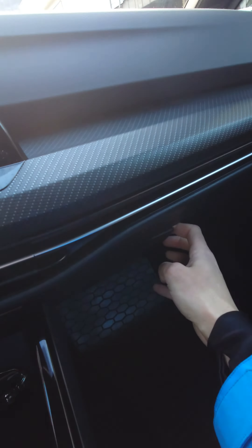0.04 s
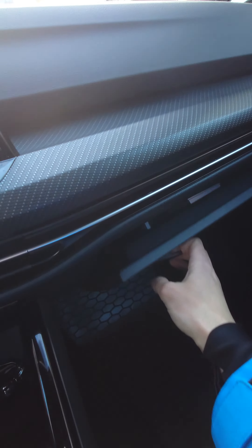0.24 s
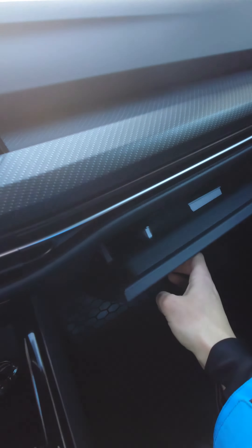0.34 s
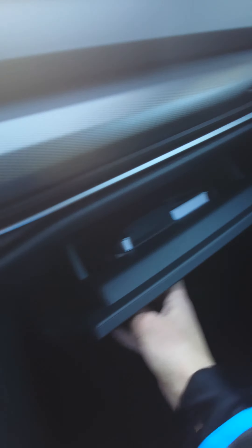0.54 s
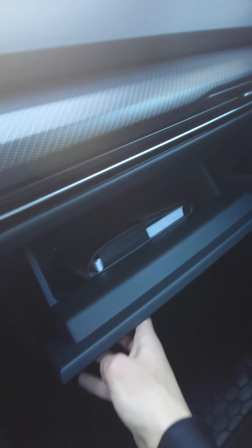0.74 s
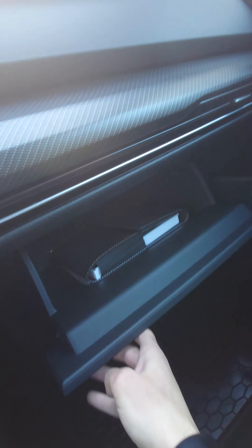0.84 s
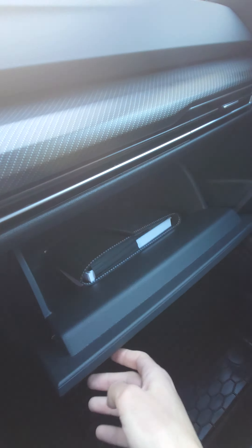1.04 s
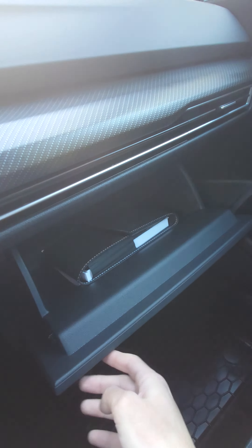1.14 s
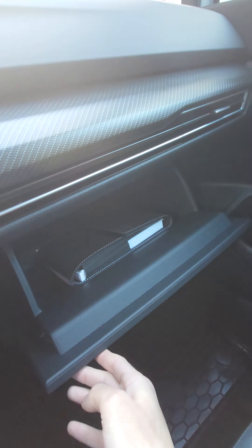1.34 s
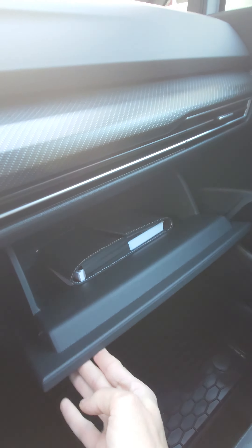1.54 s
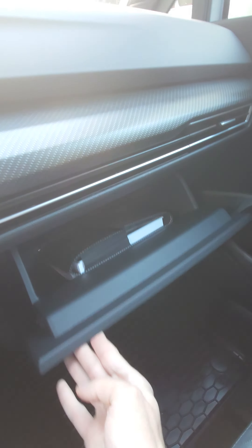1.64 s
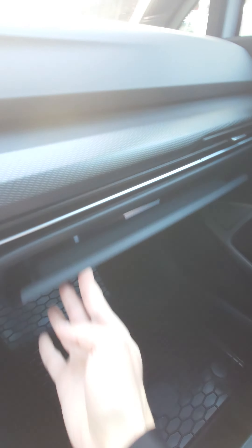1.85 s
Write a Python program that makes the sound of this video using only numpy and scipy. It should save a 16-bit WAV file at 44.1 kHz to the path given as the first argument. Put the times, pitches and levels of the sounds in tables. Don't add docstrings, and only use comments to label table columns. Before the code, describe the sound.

A car glovebox is opened by hand: faint handle touches, a sharp latch snap with a hollow thump, a soft airy lowering, light knocks, then quiet creaky rubbing. Close stereo microphone in a still, parked cabin.

```python
import sys
import numpy as np
from scipy import signal
from scipy.fft import rfft, irfft, next_fast_len
from scipy.io import wavfile
from scipy.ndimage import map_coordinates

SR = 44100
rng = np.random.default_rng(int(sys.argv[2]) if len(sys.argv) > 2 else 0)


def convert_level_to_amplitude(level_db):
    exponent = np.asarray(level_db, float) / 20
    return 10 ** exponent


def put_to_file(sound):
    columns = np.atleast_2d(sound).T
    safe = np.clip(columns, -1, 1)
    whole_steps = np.round(safe * 32767)
    wavfile.write(sys.argv[1], SR, whole_steps.astype(np.int16))


N = 83790


def along(points, hz):
    point_hz, value = np.transpose(points)
    return np.interp(np.log(hz + 1), np.log(point_hz + 1), value)


def curve(rows):
    point_s, value = np.transpose(rows)
    return np.interp(np.arange(N) / SR, point_s, value)


def unit(x):
    return x / np.sqrt(np.mean(x ** 2) + 1e-20)


def wobble(rate_hz):
    knots = rng.standard_normal(int(N * rate_hz / SR) + 4)
    return map_coordinates(knots, [np.arange(N) * rate_hz / SR])


def filtered(x, response):
    size = next_fast_len(N + SR // 2)
    hz = np.fft.rfftfreq(size, 1 / SR)
    return irfft(rfft(x, size) * response(hz), size)[..., :N]


def add(x, start_s, piece):
    part = x[..., round(start_s * SR):][..., :piece.shape[-1]]
    part += piece[..., :part.shape[-1]]


# centre_hz, width_hz, level_db
LID_MODES = [(340.7, 113, 8.5), (453, 62, 8), (649.5, 170, 8), (934, 281, -4.5), (1337, 120, -2),
             (1770, 550, 4), (2940, 510, -2.5), (3700, 640, -13.5)]


def plastic(f):
    modes = 0
    for k, (centre_hz, width_hz, level_db) in enumerate(LID_MODES):
        damping = 1j * f * width_hz
        modes = modes + (-1) ** k * convert_level_to_amplitude(level_db) * damping / (centre_hz ** 2 - f * f + damping)
    dull_hz = 2470
    return modes / (1 + 1j * f / dull_hz)


def crisp(f):
    return 1j * f / (2000 + 1j * f) / (1 + 1j * f / 9000)


def contacts(rows, ring_db, rise_s):
    rap_db, crack_db = 15, -16
    unlike = .7
    ring, scrape, crack = np.zeros(N), np.zeros((2, N)), np.zeros((2, N))
    t = np.arange(SR // 8) / SR
    for start_s, level_db, pitch_hz, bright_db, scrape_s in rows:
        u = t / .0015 * np.sqrt(pitch_hz / 1800)
        pulse = u * np.exp(1 - u)
        add(ring, start_s, convert_level_to_amplitude(level_db + ring_db) * pulse * np.sin(2 * np.pi * pitch_hz * t))
        swell = (1 - np.exp(-t / rise_s)) * np.exp(-t / np.clip(scrape_s, .001, .05) * 2)
        noise = rng.standard_normal((2, 3, len(t))) * swell
        rough, sharp = noise[:, :1] + unlike * noise[:, 1:]
        rough[:, 0] = convert_level_to_amplitude(rap_db)
        add(scrape, start_s, convert_level_to_amplitude(level_db) * rough)
        add(crack, start_s, convert_level_to_amplitude(level_db + bright_db + crack_db) * sharp)
    return ring + filtered(scrape, plastic) + filtered(crack, crisp)


# start_s, level_db, pitch_hz, bright_db, scrape_s
LATCH = [(.008, -47, 1770, 1, 0.0052), (.074, -51, 1770, -2, 0.015), (.214, -63, 2010, 9.5, 0.0079),
         (0.2227, -29, 1770, 3, 0.018), (.230, -39.5, 3700, 13, 0.013), (.240, -39.5, 1770, 7, 0.012),
         (.2515, -35, 1670, 9, 0.0062), (.258, -18, 1853, -7, 0.0075), (.2585, -27.5, 2940, -4, 0.0042),
         (.263, -33.5, 780, 9.5, 0.0146), (.267, -31, 1620, -9, 0.014), (.274, -39, 5636, 11, 0.025),
         (.282, -33, 1034, 2.5, 0.014), (.313, -41.5, 1155, 6.5, 0.0046), (0.321, -41, 1754, 4.5, 0.0058),
         (0.339, -49.5, 1750, 6, .004), (.353, -43.5, 1680, -15, 0.0018)]


def latch():
    return contacts(LATCH, ring_db=-4.5, rise_s=.0008)


# start_s, level_db, pitch_hz, bright_db,
# scrape_s
KNOCKS = [(.6528, -42.5, 1540, 12, 0.0098), (.657, -45.5, 730, 7, 0.0067), (.662, -41.5, 268, -5, 0.013),
          (.691, -48, 880, -14, 0.0088), (.965, -51.5, 726, -5, 0.0059), (0.981, -46, 604, -8, 0.0026),
          (.993, -54, 760, 2, 0.012), (.999, -47, 1050, -4.5, 0.014), (1.004, -46, 1440, -2.5, 0.02),
          (1.010, -52.5, 380, -13, 0.012), (1.034, -52.5, 1780, -10.5, 0.0066),
          (1.058, -57.5, 800, -1, 0.008), (1.598, -54.5, 1860, -7, 0.014),
          (1.615, -50.5, 441, -1.5, 0.0033), (1.66, -48.5, 900, -7, 0.0046),
          (0.033, -49.5, 1770, -7, 0.0036), (.093, -54.5, 1770, -18, 0.0034),
          (0.124, -55.5, 1730, 5, 0.0034), (.169, -53, 1770, -10, .008)]


def knocks():
    return contacts(KNOCKS, ring_db=-6, rise_s=.0002)


# start_s, level_db, pitch_hz, rise_s, t60_s
THUMPS = [(0.011, -33.5, 109, 0.018, 0.094), (0.226, -28.5, 116.7, 0.012, 0.11),
          (0.248, -25, 110.6, 0.0021, 0.091), (.272, -24.5, 110.4, 0.0045, 0.17),
          (0.236, -52, 41, 0.0099, 0.18), (0.281, -30, 41.1, 0.016, 0.43), (0.319, -34, 87.7, 0.0056, 0.18),
          (0.399, -42, 50.9, 0.013, 0.32), (0.659, -53.5, 126, 0.0047, 0.12),
          (1.022, -39, 93.8, 0.023, 0.12), (1.738, -41, 340, 0.017, 0.18), (1.82, -38, 362, 0.0087, 0.072)]


def thumps():
    x, t = np.zeros(N), np.arange(SR // 2) / SR
    for start_s, level_db, pitch_hz, rise_s, t60_s in THUMPS:
        onset = 1 - np.exp(-(t / rise_s) ** 2)
        decay = convert_level_to_amplitude(level_db - 60 * t / t60_s)
        add(x, start_s, decay * onset * np.sin(2 * np.pi * pitch_hz * t))
    return x


# freq_hz, likeness
ALIKE = [(60, 0.88), (300, 0.82), (1000, 0.17), (4000, 0.12)]


def rush(gain):
    def turn(hz):
        return np.arccos(np.clip(along(ALIKE, hz), -1, 1)) / 2

    def spread(hz):
        return gain(hz) * [np.cos(turn(hz)), np.sin(turn(hz))]

    mid, side = filtered(rng.standard_normal((2, N)), spread)
    return unit(np.array([mid + side, mid - side]))


# time_s, level_db
AIR_FLOW = [(0, -75.5), (.1, -83.5), (.2, -78), (.33, -73.5), (.45, -84), (.55, -70.5), (.65, -61),
            (.75, -65.5), (.88, -70), (.96, -79.5), (1.05, -84.5), (1.2, -93), (1.6, -103), (1.74, -84),
            (1.775, -70), (1.84, -68), (1.9, -69.5)]
# freq_hz, density_db
HISS = [(290, -42), (500, -14.5), (835, -6.5), (1110, -9.5), (1530, -13.5), (6190, -15), (7600, -12),
        (9880, -25), (16700, -120)]


def damper():
    hiss_db = 14
    colour = HISS[1:-1] + [(16000, -8.5)]
    air = rush(lambda f: convert_level_to_amplitude(along(colour, f)) * f ** 2 / (f ** 2 + 600 ** 2))
    return convert_level_to_amplitude(curve(AIR_FLOW) + hiss_db + 0.29 * wobble(19.33)) * air


# time_s, level_db
RUB = [(0, -57), (.1, -70), (.2, -74), (.3, -53), (.45, -68.5), (.6, -63), (.7, -62.5), (.9, -64),
       (1.05, -65), (1.2, -79.5), (1.58, -78.5), (1.63, -64), (1.7, -61), (1.77, -58), (1.8, -59),
       (1.84, -53.5), (1.9, -59.5)]


def rub():
    slips_per_s, spread_db, rub_db = 2500, 2, -3.5
    draw = rng.random((2, N))
    happens = draw[0] < slips_per_s / SR
    strength = convert_level_to_amplitude(-spread_db * np.log(draw[1] + 1e-9))
    slips = happens * strength * rng.standard_normal(N)
    return convert_level_to_amplitude(curve(RUB) + rub_db + 1.12 * wobble(40.12)) * unit(filtered(slips, plastic))


# freq_hz, level_db
NAIL = [(4000, -29), (5500, -21.5), (7500, -14), (11000, -2.5), (16000, -2.5)]


def nail():
    start_s, level_db, t60_s = .040, -37, .02
    x, t = np.zeros(N), np.arange(SR // 8) / SR
    add(x, start_s, convert_level_to_amplitude(level_db - 60 * t / t60_s) * rng.standard_normal(len(t)))
    return filtered(x, lambda f: convert_level_to_amplitude(along(NAIL, f)))


# freq_hz, t60_s
SEATS = [(300, .04), (8000, .025)]


def seats(x):
    hz, t, z = signal.stft(rng.standard_normal((2, SR // 6)), SR, nperseg=128)
    hz = hz[:, None]
    fading = z * convert_level_to_amplitude(-60 * t / along(SEATS, hz)) * (hz > 250)
    tail = signal.istft(fading, SR, nperseg=128)[1]
    late = np.pad(x, (60, 0))[None]
    return signal.fftconvolve(late, tail / np.linalg.norm(tail[0]), axes=1)[:, :N]


# time_s, level_db
SWAY = [(0, -59), (.19, -63), (.3, -61), (.45, -56), (.62, -58), (.72, -67.5), (.9, -74), (1.0, -54.5),
        (1.06, -53.5), (1.15, -51), (1.24, -63.5), (1.3, -54), (1.4, -62.5), (1.55, -59), (1.7, -73.5),
        (1.9, -63)]
# freq_hz, density_db
BOOM = [(10, -22.5), (18, 2), (45, -3), (70, -25.5), (120, -49.5), (300, -120)]


def boom():
    return convert_level_to_amplitude(curve(SWAY) + wobble(17)) * rush(lambda f: convert_level_to_amplitude(along(BOOM, f)))


# time_s, level_db
WHINE_LEVEL = [(0, -77.5), (.9, -70), (1.3, -92.5), (1.9, -81.5)]


def whine():
    pitch_hz, width_hz = 6270, 270
    tone = rush(lambda f: 1 / (1 + ((f - pitch_hz) / width_hz) ** 4))
    return convert_level_to_amplitude(curve(WHINE_LEVEL) + 2.9 * wobble(24.83)) * tone


# freq_hz, density_db
HUM = [(40, -31), (70, -5), (130, -11), (170, -23.5), (300, -100)]
# freq_hz, density_db
STILL_AIR = [(200, -38.5), (270, -13.5), (350, -3.5), (570, -8.5), (830, 3), (1170, -11), (1900, -16.5),
             (4000, -34.5)]


def cabin():
    hum_db, air_db = -70, -74.5
    hum = convert_level_to_amplitude(hum_db + 1.3 * wobble(3.3)) * rush(lambda f: convert_level_to_amplitude(along(HUM, f)))
    air = convert_level_to_amplitude(air_db + 0.98 * wobble(11.25)) * rush(lambda f: convert_level_to_amplitude(along(STILL_AIR, f)))
    return hum + air


# freq_hz, left_over_right_db
PORTS = [(150, 1.3), (300, -6.5), (600, 1), (1200, -11), (2500, -9.5), (5000, -20), (12000, 1.5)]


def scene():
    lead_s, wet_db = .00015, -2.5
    side = np.array([[1], [-1]])

    def ports(f):
        return convert_level_to_amplitude(side * along(PORTS, f) / 2) * np.exp(side * 1j * np.pi * f * lead_s)

    lid = latch() + knocks() + rub() + nail()
    direct = filtered(lid + thumps(), ports)
    answer = convert_level_to_amplitude(wet_db) * seats(lid.mean(axis=0))
    return direct + answer + damper() + boom() + whine() + cabin()


def top_cut(x):
    return signal.sosfilt(signal.butter(12, 16270, fs=SR, output="sos"), x)


# freq_hz, level_db
MIC = [(7500, 0.5), (8000, -9.5), (8250, -28), (8900, -11), (9500, -15), (10200, -2), (15750, -10.5),
       (15900, -68.5)]


def record(dry):
    mix = filtered(dry, lambda f: convert_level_to_amplitude(along(MIC, f)))
    return top_cut(mix)


dry = scene()
out = record(dry)
put_to_file(out)
```